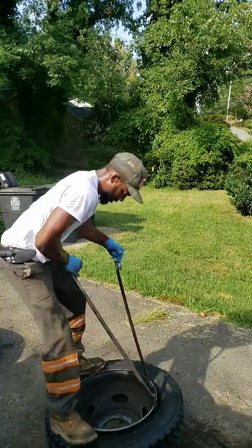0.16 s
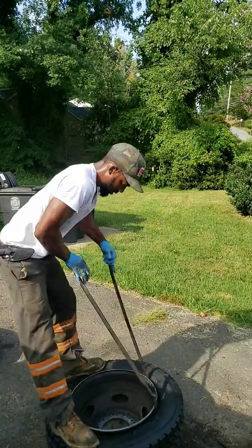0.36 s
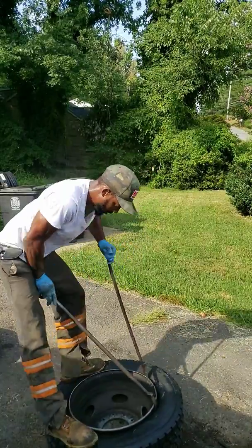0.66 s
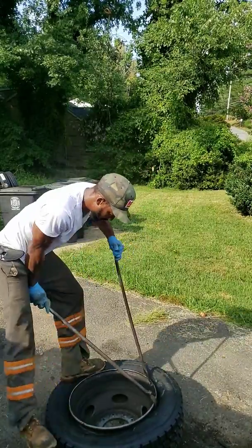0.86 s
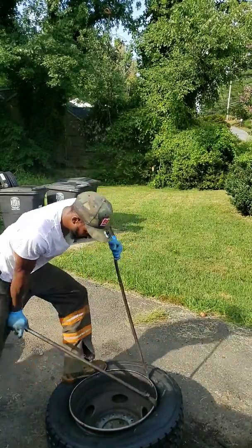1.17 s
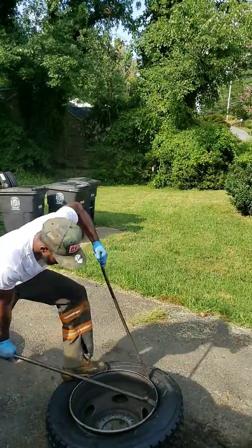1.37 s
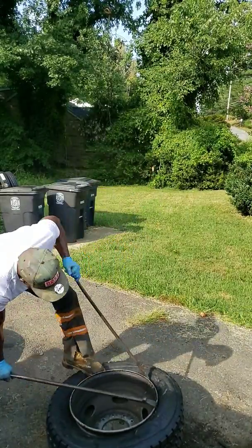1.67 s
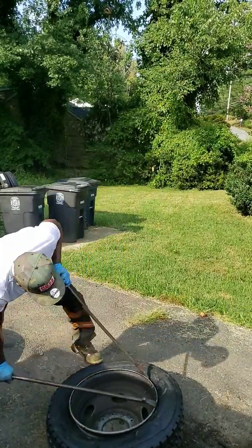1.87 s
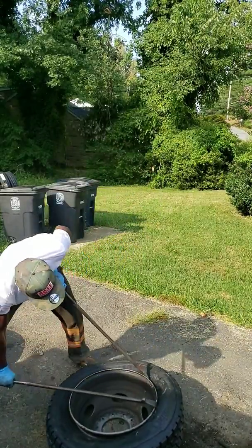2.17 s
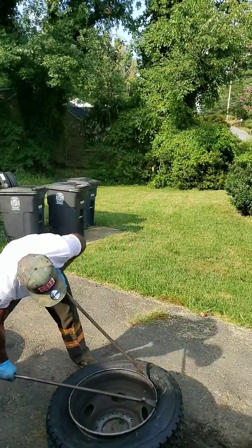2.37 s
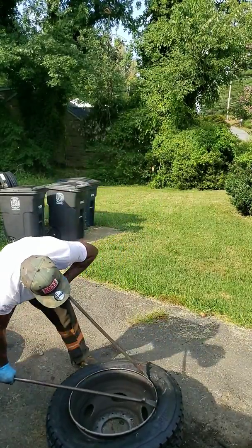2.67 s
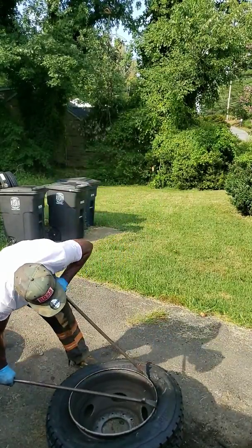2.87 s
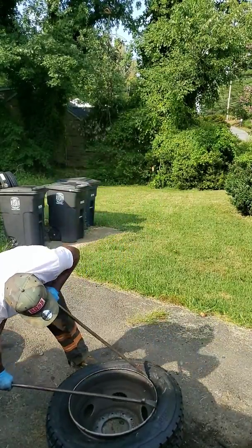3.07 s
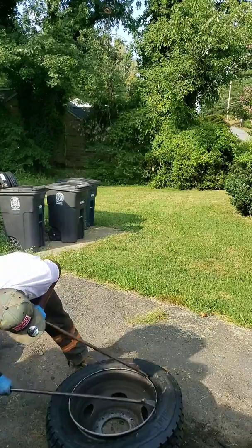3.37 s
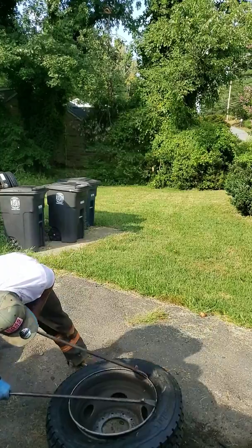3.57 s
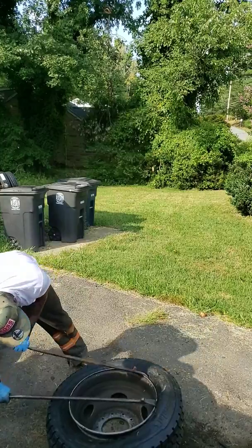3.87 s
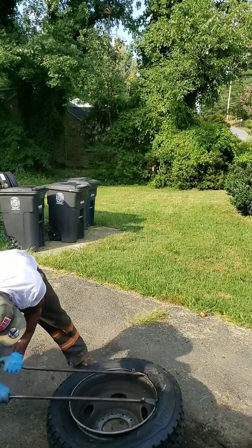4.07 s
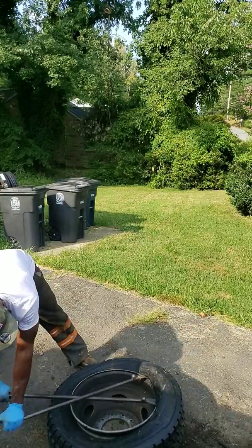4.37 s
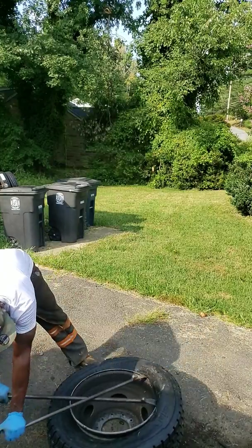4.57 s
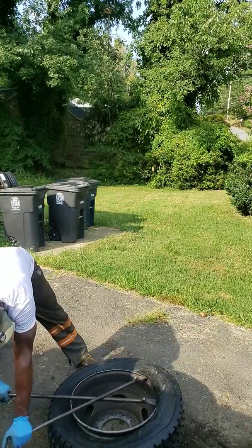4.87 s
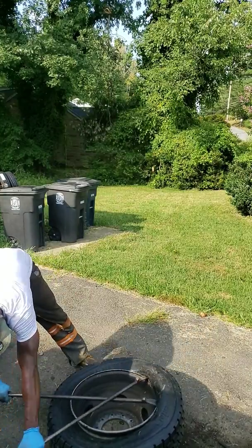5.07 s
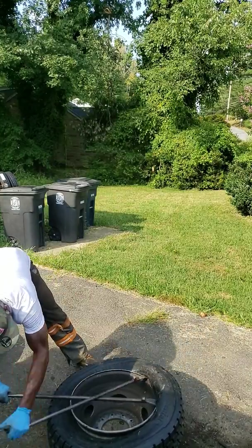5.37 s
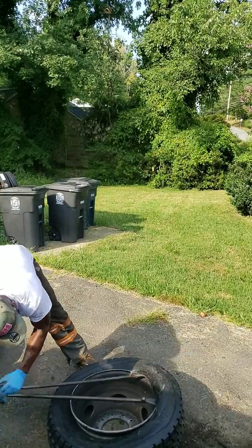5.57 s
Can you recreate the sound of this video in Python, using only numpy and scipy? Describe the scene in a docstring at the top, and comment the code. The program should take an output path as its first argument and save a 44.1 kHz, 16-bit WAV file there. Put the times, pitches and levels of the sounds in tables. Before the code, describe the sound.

Steel tire irons work a truck tire off its wheel on a driveway, about two metres from the microphone. A dull knock with a deep tire boom comes right at the start, and another knock with a short clatter at 0.7 seconds. A soft thump follows at 1.2, a tiny tick of grit at 1.6 and a lighter knock at 2 seconds. Only soft low bumps come between 2.5 and 3.3. At 3.8 an iron clanks and the tire booms, then several smaller knocks lead to the loudest, brightest clank at 4.4, which rings briefly. Dull thumps follow near 4.7. An iron slides faintly along the rim from 4.8, ending in a short, stronger scrape around 5.3 seconds. Throughout, a high insect chorus hisses over an uneven low rumble and faint far traffic; this background grows louder at about 2.5 seconds and stays up.

```python
"""Two steel tire irons knock, clank and scrape on a wheel rim, prying a truck tire off on a driveway.
Each impact excites damped modes: a dull knock, a dense clatter, the ring of the wheel and the air
cavity of the tire. Tire booms and bumps of rumble thump low, stick-slip friction drives the rim, and
a grain of grit snaps. Behind the work an insect chorus hisses over low rumble, far traffic and a soft
band of noise. Two microphone ports, two metres away, receive the sound."""
import sys
import numpy as np
from scipy import signal
from scipy.fft import rfft, irfft
from scipy.io import wavfile
from scipy.ndimage import uniform_filter1d

SR = 44100
rng = np.random.default_rng(int(sys.argv[2]) if len(sys.argv) > 2 else 0)


def file_out(sig):
    """Save sig as 16-bit WAV at sys.argv[1]."""
    # one column per channel
    cols = np.atleast_2d(sig).T
    # limit, then scale
    lim = np.clip(cols, -1, 1)
    pcm = np.round(lim * 32767).astype(np.int16)
    wavfile.write(sys.argv[1], SR, pcm)


N = 252252
TIME = np.arange(N) / SR
HZ = np.maximum(np.arange(N // 2 + 1) * SR / N, 1)


# Iron meets rim or bead: t/s, knock peak/dB, nominal knock f/Hz, tire air peak/dB, clatter peak/dB,
# clatter tilt/(dB per octave), contact cutoff f/Hz, wheel ring gain/dB
IMPACTS = [(0.005, -24.5, 402, -35, -36.5, 30, 1870, -50), (0.133, -47, 328, -60, -67, -8, 1200, -61),
           (0.241, -47.5, 318, -45.5, -47, 0, 1200, -76), (0.694, -24, 347, -41, -32, -4, 2500, -58.5),
           (0.741, -45, 296, -41.5, -39, 25, 2520, -67), (1.221, -49, 275, -40.5, -45.5, -5, 2700, -68),
           (1.28, -47, 510, -48.5, -49, 4, 1200, -78), (1.873, -45, 252, -42.5, -51, -7, 1190, -76),
           (1.995, -31, 640, -36, -31, -8, 2620, -68), (2.0201, -40, 500, -45, -45, 4, 2900, -75),
           (3.76, -28.5, 756, -27, -20.5, 0, 4280, -54), (3.813, -39, 263, -23.5, -37, 6, 2800, -58),
           (3.902, -39, 266, -29.5, -65, -12, 2800, -72), (4.059, -61, 253, -29.5, -43, 10, 3000, -73),
           (4.171, -33, 586, -29.5, -35, 3, 3600, -62), (4.196, -29, 364, -33.5, -35, -19, 2000, -69),
           (4.214, -38.5, 577, -57, -46.5, 12, 3600, -65), (4.3923, -25.5, 386, -22, -9.5, 2, 6900, -36.5),
           (4.715, -42, 289, -46, -66, -3, 1180, -71), (4.777, -38, 344, -39, -63, -3, 1190, -62)]

def iron_impacts():
    """Impact excitation: four responses add; a longer contact excites fewer high modes of the steel."""
    out, t = np.zeros((2, N)), np.arange(16000) / SR
    band_hz = 500 * 2 ** (np.arange(13) / 3)
    bands = steel_bands(band_hz)
    for onset, knock_db, knock_hz, air_db, clatter_db, tilt_db, cutoff_hz, ring_db in IMPACTS:
        knock = peak(dull_knock(t, knock_hz), knock_db)
        clatter = steel_clatter(t, bands, band_hz, clatter_db, tilt_db, cutoff_hz)
        ring = wheel_ring(t, ring_db, cutoff_hz)
        add(out, knock + clatter + ring + peak(tire_air(t), air_db), onset)
    return out


def dull_knock(t, hz):
    """Heavily damped oscillation: the frequency falls as the contact slackens."""
    cycles = hz * (0.78 * t + 0.45 * 0.0045 * (1 - np.exp(-t / 0.0064)))
    return -np.sin(2 * np.pi * cycles) * decay(t, 9 / hz) * rise(t, 0.0011)


def steel_bands(band_hz):
    """Modal overlap: countless short modes of rim and irons merge into third-octave bands of noise."""
    steel = rng.standard_normal((2, 60000))
    steel = steel + 0.27 * steel[::-1]  # partly coherent between the channels
    return np.array([unit(bandpass(steel, f / 2 ** (1 / 6), f * 2 ** (1 / 6))) for f in band_hz])


# Radiation spectrum of the steel: f/Hz, relative level/dB
STEEL_RADIATION = [(500, -3.5), (700, -0.5), (1050, -2.5), (1400, 6), (1750, 7.5), (2200, 0.5), (2650, 2.5),
                   (3100, -0.5), (3550, -4), (4200, 7), (5000, 6.5), (6200, 6), (7500, -1.5)]

def steel_clatter(t, bands, band_hz, peak_db, tilt_db, cutoff_hz):
    """Frequency-dependent damping: the treble dies first, and harder blows clatter longer."""
    start = rng.integers(40000)
    t60_at_2khz = 0.047 * 2 ** ((peak_db + 60) / 56)  # doubles every 56 dB
    t60 = t60_at_2khz * (band_hz[:, None] / 2000) ** -0.4
    crack = undb(3.5) * decay(t, 0.35 * t60)
    reflections = undb(-14) * decay(t, 5.4 * t60)  # from the ground and the wheel well
    envelope = (crack + decay(t, t60) + reflections) * rise(t, 0.0018)
    band_db = on_hz(STEEL_RADIATION, band_hz) + tilt_db * np.log2(band_hz / 2000)
    gain = undb(band_db) / (1 + (band_hz / cutoff_hz) ** 14)
    fading_bands = (gain[:, None] * envelope)[:, None] * bands[:, :, start:start + len(t)]
    return peak(fading_bands.sum(axis=0), peak_db)


# Modes of the free wheel: f/Hz, relative level before tilt/dB, free T60/s
WHEEL_MODES = [(352, 3, .35), (543, 0.5, .7), (722, -4, .5), (1215, 18, .11), (1310, 16, .07),
               (1425, 18, .1), (1688, 6, .25), (1880, 6, .1), (2200, 18, .09), (2304, 13, .1),
               (2425, 15, .11), (2545, 12, .13), (2789, 10, .27), (3490, 21, .08), (3660, 13, .1),
               (4436, 8, .08), (4613, 6, .08), (5050, 11, .06), (6390, 12, .05)]

def wheel_ring(t, ring_db, cutoff_hz):
    """Modal superposition: the wheel rings as a sum of decaying sinusoids, damped by the tire."""
    hz, mode_db, free_t60 = np.transpose(WHEEL_MODES)
    modes = np.exp(2j * np.pi * hz[:, None] * t) * rise(t, 0.0041) * decay(t, 0.87 * free_t60[:, None])
    phase_draw, side_draw, level_draw = rng.standard_normal((3, len(hz)))
    # high modes radiate from different parts of the rim and reach the two ports out of phase
    phase = 2 * phase_draw + np.clip(hz / 3000, 0, 0.8) * side_draw * np.array([[0.5], [-0.5]])
    tilt_db = -2 * np.log2(hz / 544)
    gain = undb(ring_db + mode_db + tilt_db + 0.68 * level_draw) / (1 + (hz / cutoff_hz) ** 8)
    return np.imag((gain * np.exp(1j * phase)) @ modes)


# Modes of the air in the tire: f/Hz, relative level/dB, T60/s
CAVITY_MODES = [(181.5, 1, 0.17), (206.4, -15, 0.44)]

def tire_air(t, delay_s=0.00873):
    """Cavity resonance: the enclosed air answers just after the blow."""
    age = t - delay_s
    air = sum(undb(db) * np.sin(2 * np.pi * hz * age) * decay(age, t60) for hz, db, t60 in CAVITY_MODES)
    return air * rise(age, 0.0011)


# Tire booms and brief bumps of deep rumble: t/s, peak level/dB, nominal f/Hz, early T60/s
LOW_THUMPS = [(-0.01262, -17.5, 76.5, 0.06), (0.163, -35.5, 84, 0.093), (0.697, -24, 84.5, 0.025),
              (0.802, -36.5, 73.6, 0.03), (1.095, -35, 81, 0.064), (1.219, -30, 78.5, 0.083),
              (1.259, -32, 52.6, 0.1), (2.472, -33.5, 71, 0.25), (2.539, -39, 63.6, 0.088),
              (2.869, -33, 64.6, 0.11), (3.008, -29, 67.7, 0.16), (3.283, -27, 67.4, 0.13),
              (3.816, -20, 71.8, 0.11), (3.906, -27.5, 87, 0.054), (4.055, -24, 73.2, 0.068),
              (4.205, -29.5, 73.7, 0.17), (4.397, -33, 86.6, 0.36), (4.722, -30, 89, 0.23),
              (4.778, -30.5, 75.8, 0.16), (5.353, -29, 80, 0.085), (5.553, -35.5, 49, 0.17),
              (5.608, -33, 51.1, 0.13)]

def low_thumps():
    """Two-stage decay: a low tone dies quickly, then hums on faintly as its pitch sags."""
    out, t = np.zeros((2, N)), np.arange(SR // 2) / SR
    for onset, db, hz, t60 in LOW_THUMPS:
        cycles = hz * (0.815 * t + 0.4 * 0.024 * (1 - np.exp(-t / 0.02)))
        envelope = (decay(t, t60) + undb(-9) * decay(t, 3.5 * t60)) * rise(t, 0.0079) ** 2
        add(out, peak(np.sin(2 * np.pi * cycles) * envelope, db), onset)
    return out


# An iron slides along the rim: t/s, push/s, hold/s, release/s, level/dB
SCRAPES = [(4.784, 0.064, 0.21, 0.23, -52), (5.248, .085, .025, 0.037, -40)]
# Resonances of the damped rim: f/Hz, nominal bandwidth/Hz, relative level/dB
RIM_MODES = [(462, 64, 6.5), (740, 36, 1.5), (1237, 67, 3), (1490, 150, 3.5), (1660, 94, 4),
             (2090, 170, -1), (2465, 83, 3.5)]

def iron_scrapes(slips_per_s=2500, ramp_db=21):
    """Stick-slip friction: dense, uneven clicks excite the damped rim."""
    slips = rng.random(N) < slips_per_s / SR
    clicks = slips * undb(1.2 * rng.exponential(size=N)) * rng.standard_normal(N)
    phasors = np.exp(1j * rng.standard_normal((len(RIM_MODES), 2, 1)))
    rim = sum(undb(db) * resonance(hz, width) ** 1.44 * phasor
              for (hz, width, db), phasor in zip(RIM_MODES, phasors))
    envelope = np.zeros(N)
    for onset, push, hold, release, db in SCRAPES:
        corners = np.cumsum([onset, push, hold, release])
        envelope += undb(np.interp(TIME, corners, [db - ramp_db, db, db, db - ramp_db], -200, -200))
    friction = clicks * undb(1.5 * wander(50))
    return envelope * unit(irfft(rfft(friction) * rim, N))


# A grain of grit snaps: t/s, peak level/dB
GRIT_SNAPS = [(1.6246, -28)]

def grit():
    """A brief transient has a broad spectrum: the snap is heard as a treble tick."""
    out, t = np.zeros((2, N)), np.arange(400) / SR
    for onset, db in GRIT_SNAPS:
        burst = rng.standard_normal(len(t)) * decay(t, 0.0085)
        add(out, peak(bandpass(burst, 4300, 12500), db), onset)
    return out


# The background rises about 6 dB midway: t/s, level of the insect hiss at 8-15 kHz/dB
BACKGROUND_LEVEL = [(0.05, -52.5), (1.72, -52.5), (2.31, -51.5), (2.58, -48), (2.9, -46), (3.45, -46),
                    (4.4, -46), (5.7, -46.5)]
# Insect hiss: f/Hz, relative spectral density/dB
HISS_SPECTRUM = [(2800, -33), (3050, -32.5), (3900, -0.5), (4700, 0.5), (6600, -3), (8000, -2.5),
                 (9700, -3), (10500, 0), (11000, -2.5), (12000, -2), (13600, 2.5), (14100, -6), (14700, -6),
                 (15000, -1)]
# Louder bands of the chorus: f/Hz, nominal bandwidth/Hz, level re hiss/dB
SONG_BANDS = [(4560, 350, -14), (5720, 100, -20), (6580, 120, -18), (8780, 150, -21), (10300, 220, -15),
              (11300, 260, -9.5), (12200, 160, -19), (12930, 90, -17), (13470, 230, -14)]

def insects():
    """Incoherent summation: many insects merge into a smooth hiss with flickering bands."""
    hiss = air_noise(undb(on_hz(HISS_SPECTRUM, HZ)) * (HZ > 2800), 8000, 15000)
    song = sum(undb(db + 2 * wander(30)) * air_noise(resonance(hz, width) ** 2)
               for hz, width, db in SONG_BANDS)
    return (hiss + song) * undb(on_time(BACKGROUND_LEVEL))


# Deep rumble: f/Hz, relative spectral density/dB
RUMBLE_SPECTRUM = [(11, -45), (18, -22), (48, 11), (65, 2), (77, 8.5), (124, -6), (170, -50), (220, -56),
                   (370, -120)]
# Its gusts: t/s, level/dB
RUMBLE_GUSTS = [(0.03, -35.5), (0.17, -48.5), (0.5, -50), (0.99, -50.5), (1.26, -43.5), (1.4, -51.5),
                (1.84, -52), (2.0, -47.5), (2.36, -49.5), (2.8, -44), (3.37, -46), (3.7, -46), (3.97, -41),
                (4.19, -42), (4.35, -47.5), (4.76, -41), (5.15, -42.5), (5.45, -42), (5.7, -43)]

def rumble():
    """Amplitude modulation: two low noise bands swell in gusts, the upper one more steeply."""
    gust_db = on_time(RUMBLE_GUSTS)
    upper_db = -61 + 1.44 * (gust_db + 47)
    deep = air_noise(undb(on_hz(RUMBLE_SPECTRUM, HZ)) * (HZ > 18) * (HZ < 170))
    upper = air_noise(resonance(180, 237) ** 2)
    return deep * undb(gust_db + wander(9)) + upper * undb(upper_db + 3.9 * wander(9))


# Far traffic: f/Hz, relative spectral density/dB
TRAFFIC_SPECTRUM = [(65, -30), (110, -15), (129, -5), (264, -15.5), (495, -16), (616, -11.5), (1060, -22.5),
                    (1220, -17.5), (1870, -22.5), (2730, -20.5), (3020, -25.5), (3600, -18.5), (4680, -51),
                    (7920, -120)]

def traffic():
    """Broadband noise: a far murmur whose 300-900 Hz part lies about 12 dB below the insect hiss."""
    murmur = air_noise(undb(on_hz(TRAFFIC_SPECTRUM, HZ)) * (HZ > 110) * (HZ < 3600), 300, 900)
    return murmur * undb(on_time(BACKGROUND_LEVEL) - 12 + 0.8 * wander(12))


# Soft midrange noise: t/s, level/dB
MID_BAND_LEVEL = [(0.05, -64), (0.6, -62.5), (2.31, -64), (2.79, -63), (3.4, -82.5), (5.7, -70)]

def mid_band():
    """Band-limited noise: a faint rush near 1.1 kHz wavers in level."""
    return air_noise(resonance(1117, 610) ** 2) * undb(on_time(MID_BAND_LEVEL) + 1.5 * wander(7))


# Likeness of left and right in the open air: f/Hz, coherence (0-1)
COHERENCE = [(60, 1), (130, 0.87), (290, 0.86), (640, 0.48), (1400, 1), (3000, 0), (4500, 1), (6700, 0),
             (15000, 0.34)]

def air_noise(gain, lo_hz=1, hi_hz=22050):
    """Partial coherence: mid and side noise mix to stereo, with rms 1 between lo_hz and hi_hz."""
    coherence = on_hz(COHERENCE, HZ)
    mid, side = rfft(rng.standard_normal((2, N)))
    spectrum = gain * (np.sqrt(1 + coherence) * mid + np.sqrt(1 - coherence) * side * [[1], [-1]])
    in_band = spectrum[:, (HZ > lo_hz) & (HZ < hi_hz)]
    return irfft(spectrum, N) * N / np.sqrt(np.sum(np.abs(in_band) ** 2))


def undb(db):
    """Amplitude ratio of a level."""
    return 10 ** (np.asarray(db) / 20)


def on_hz(table, hz):
    """Interpolation of an (f, value) table in log frequency."""
    freqs, values = np.transpose(table)
    return np.interp(np.log(hz), np.log(freqs), values)


def on_time(table):
    """Linear interpolation of a (t, value) table."""
    return np.interp(TIME, *np.transpose(table))


def unit(x):
    """Normalisation to rms 1."""
    return x / np.sqrt(np.mean(x ** 2))


def peak(x, db):
    """Normalisation to a peak level."""
    return x * undb(db) / np.max(np.abs(x))


def resonance(hz, width):
    """Complex frequency response of a damped oscillator."""
    return 1 / (1 + 1j * (HZ / hz - hz / HZ) * hz / width)


def bandpass(x, lo_hz, hi_hz):
    """Maximally flat band-pass filtering."""
    return signal.sosfilt(signal.butter(3, [lo_hz, hi_hz], "bandpass", fs=SR, output="sos"), x)


def wander(rate):
    """Slow random modulation: rate steps a second, smoothed twice, rms 1."""
    hold = int(SR / rate)
    steps = np.repeat(rng.standard_normal(N // hold + 1), hold)
    return unit(uniform_filter1d(uniform_filter1d(steps, hold), hold)[:N])


def rise(t, tau):
    """Exponential approach to 1 with time constant tau."""
    return 1 - np.exp(-np.maximum(t, 0) / tau)


def decay(t, t60):
    """Exponential decay of 60 dB in t60 seconds, silent before zero."""
    return np.exp(-np.log(1000) * np.maximum(t, 0) / t60) * (t >= 0)


def add(out, x, onset):
    """Superposition of x on out from the onset in seconds."""
    i = int(onset * SR)
    out[:, max(i, 0):i + x.shape[-1]] += x[..., max(-i, 0):N - i]


def scene():
    """Linear superposition: the foreground sounds add to the background of the yard."""
    foreground = iron_impacts() + low_thumps() + grit() + iron_scrapes()
    return foreground + insects() + rumble() + traffic() + mid_band()


# Hand and case shade the right port: f/Hz, left minus right level/dB
PORT_SHADING = [(60, -1), (110, -3), (190, 5), (380, 0.5), (700, 1.5), (1400, 2.5), (2100, 4), (2600, 10.5),
                (3150, 13), (4700, 0.5), (6500, 18.5), (8000, 6.5), (11300, 16), (15000, 5)]
# Phase lead of the left port: f/Hz, phase/rad
PORT_LEAD = [(60, 0.05), (130, 0.72), (200, 0.75), (380, 0.32), (780, 1.02), (1400, 2), (3450, 0.07),
             (5000, 1.6), (6500, 0.37), (8400, 5.2), (15000, 4.1)]

def record(dry, cutoff_hz=15490):
    """Acoustic shadowing: two ports a hand apart differ in level and phase; a low-pass cuts the top."""
    shading = undb(on_hz(PORT_SHADING, HZ) * np.array([[0.3], [-0.7]]))
    phase = on_hz(PORT_LEAD, HZ) * np.array([[0.5], [-0.5]])
    at_ports = irfft(rfft(dry) * shading * np.exp(1j * phase), N)
    return signal.sosfilt(signal.ellip(16, 0.3, 70, cutoff_hz, fs=SR, output="sos"), at_ports)


dry = scene()
out = record(dry)
file_out(out)
```